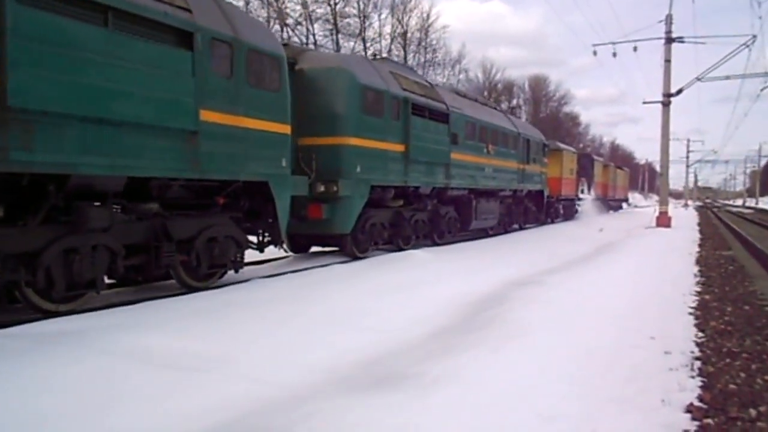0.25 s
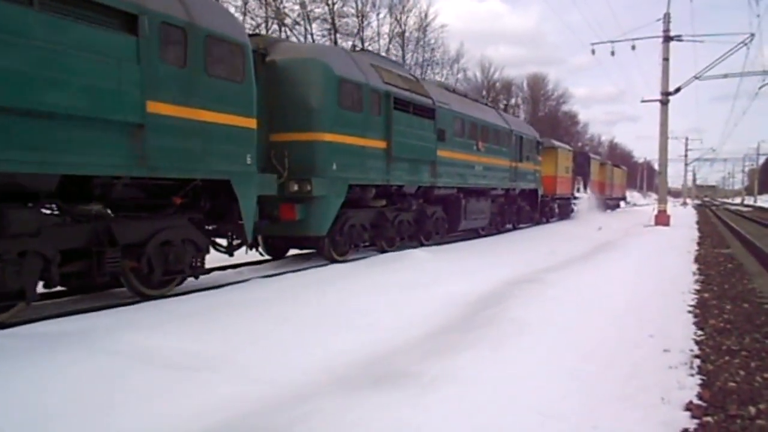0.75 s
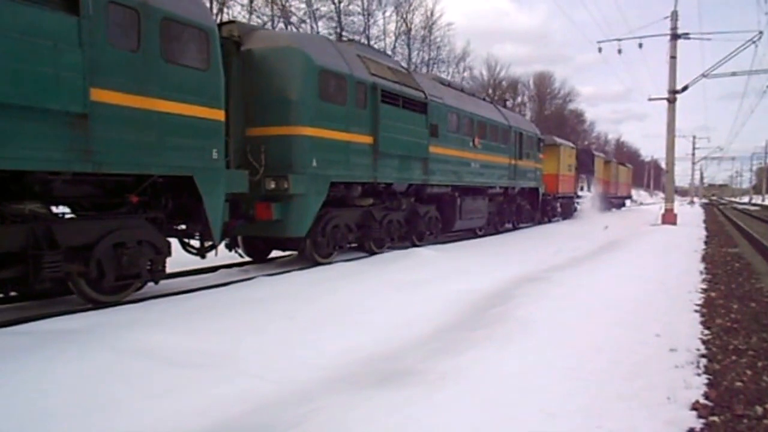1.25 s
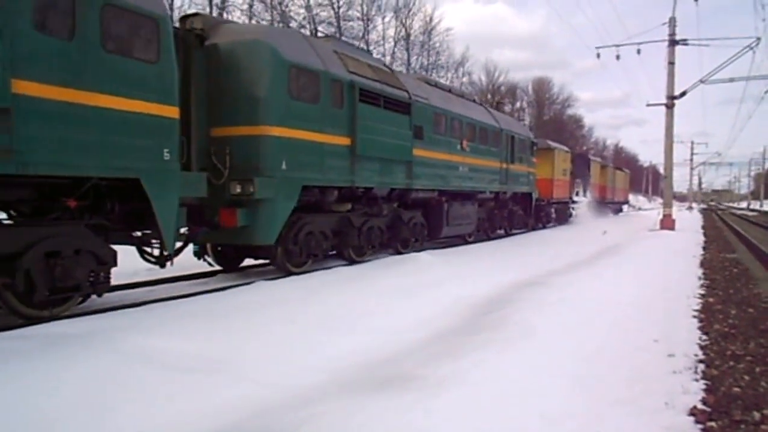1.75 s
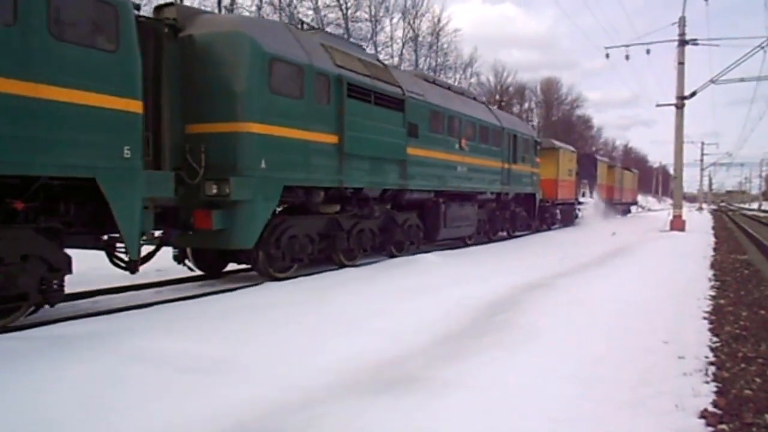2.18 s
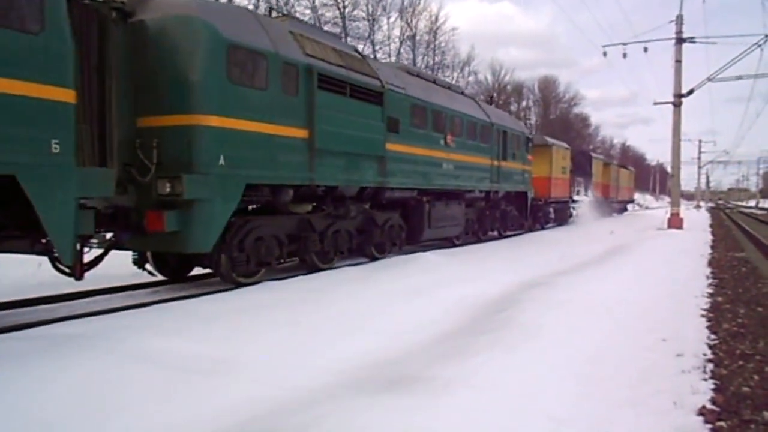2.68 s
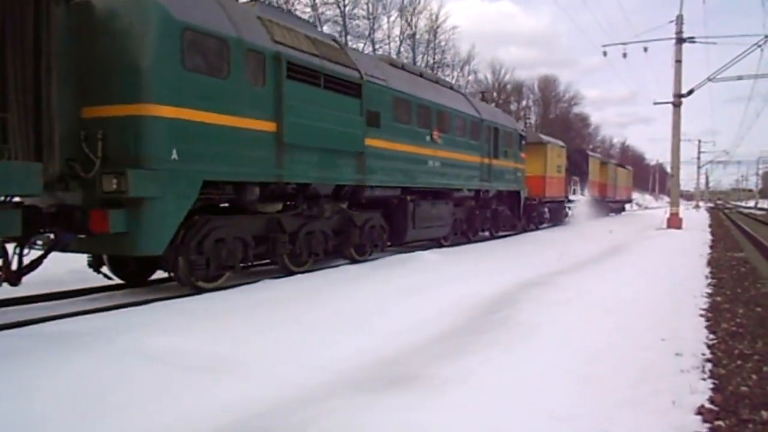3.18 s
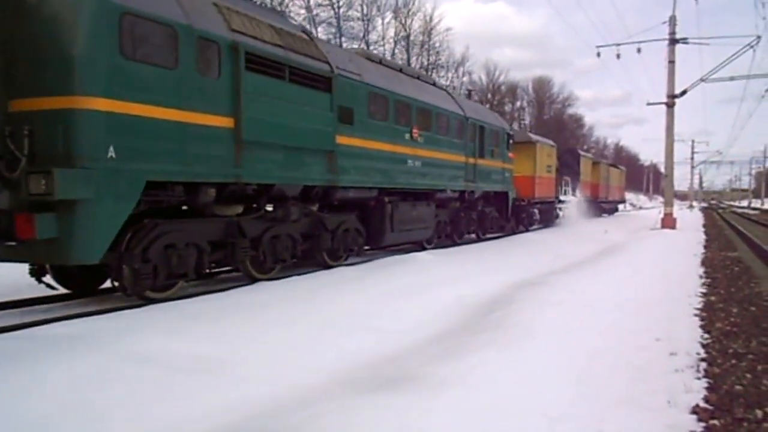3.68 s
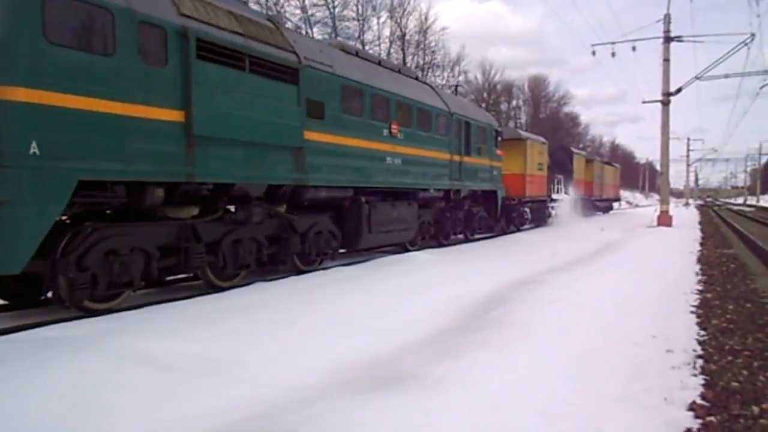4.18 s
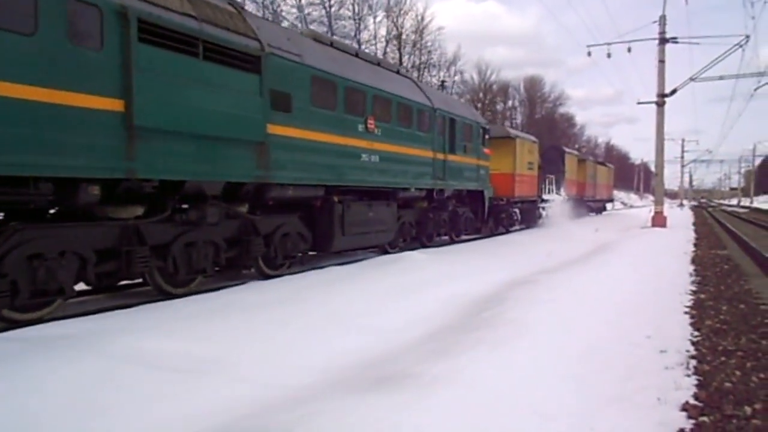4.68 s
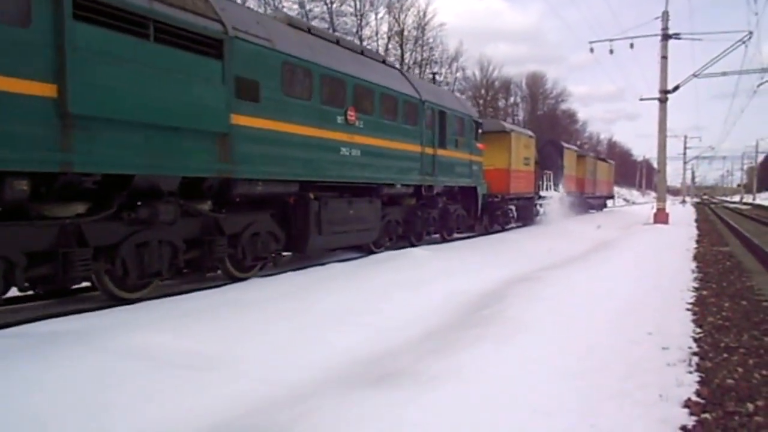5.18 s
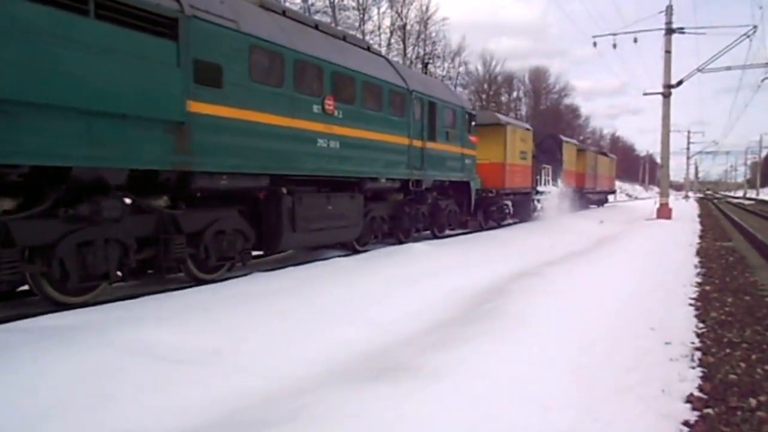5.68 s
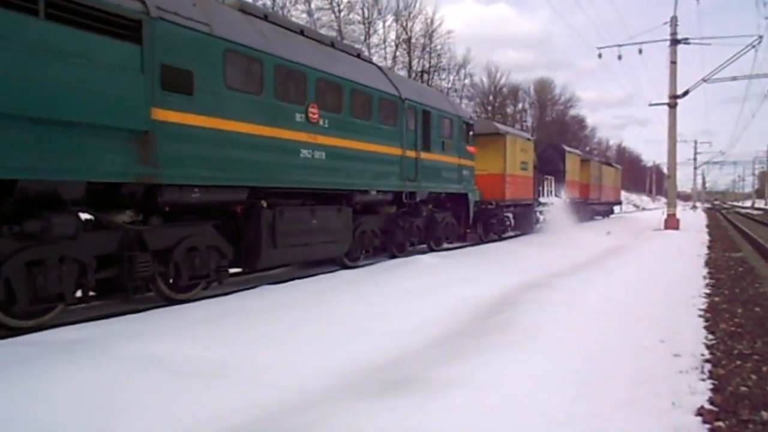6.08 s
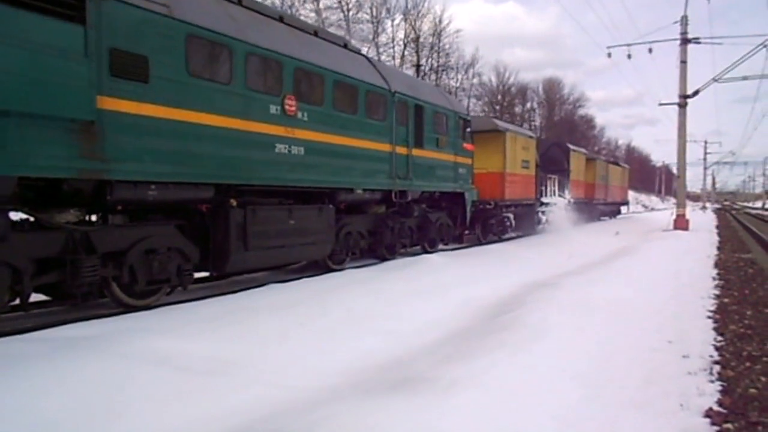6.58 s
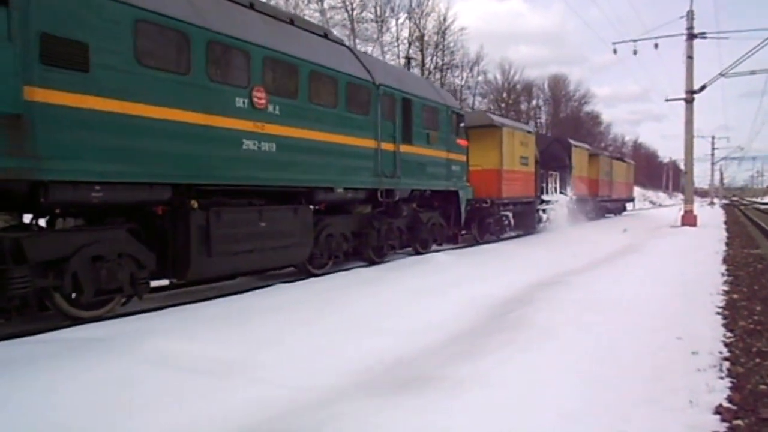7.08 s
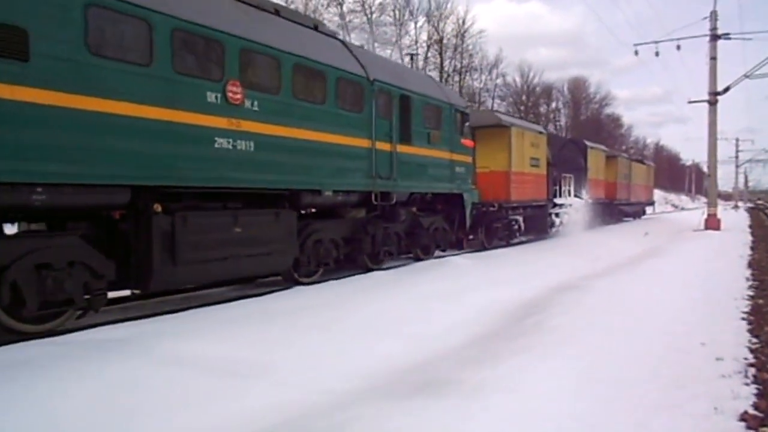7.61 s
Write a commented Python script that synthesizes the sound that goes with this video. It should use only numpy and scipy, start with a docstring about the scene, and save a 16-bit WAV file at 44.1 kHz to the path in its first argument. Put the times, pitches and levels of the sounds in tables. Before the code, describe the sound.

A heavy diesel locomotive in two sections rolls slowly by, very close to a small outdoor microphone. Two idling engines boom at slightly different speeds, making a rapid low flutter. Wheel rumble, engine-room roar, cooling-air hiss and faint gear whine surround it. Early squeaks and scrapes give way to a dull clank with an air puff, then light rattling in the middle and sharp clicks later. The engine sound continues to the end.

```python
"""A two-section diesel locomotive rolls slowly past; its engines idle at slightly different speeds.
Their exhaust notes, harmonics of each crankshaft, beat about seven times a second.
A fan hums and gears whine as tones; engine rooms, rolling wheels, air and draught are coloured noise.
Flanges scrape as shaken resonances; brake rigging squeaks by stick-slip and rattles with short decaying rings."""
import sys
import numpy as np
from scipy import signal
from scipy.fft import rfft, irfft, next_fast_len
from scipy.io import wavfile
from scipy.ndimage import uniform_filter1d, map_coordinates

SR = 44100
rng = np.random.default_rng(int(sys.argv[2]) if len(sys.argv) > 2 else 0)


def file_out(sig):
    """Save sig as 16-bit WAV at sys.argv[1]."""
    # one column per channel
    cols = np.atleast_2d(sig).T
    # limit, then scale
    lim = np.clip(cols, -1, 1)
    pcm = np.round(lim * 32767).astype(np.int16)
    wavfile.write(sys.argv[1], SR, pcm)


N = 346185
TIME = np.arange(N) / SR


def amp(db):
    """The decibel law: amplitude gain is ten to the power of level over twenty."""
    return 10 ** (np.asarray(db) / 20)


def unit(x):
    """Normalization by the root mean square, to rms 1."""
    return x / np.sqrt(np.mean(x ** 2) + 1e-20)


def curves(rows):
    """Linear interpolation in time: one value per sample for each column after the time."""
    knot_s, *columns = np.transpose(rows)
    return [np.interp(TIME, knot_s, column) for column in columns]


def wobble(rate):
    """Slow random modulation: a smooth spline through random knots, rate of them a second."""
    knots = rng.standard_normal(int(N * rate / SR) + 4)
    return map_coordinates(knots, [TIME * rate])


def filtered(x, response):
    """Linear filtering: the spectrum of x times a response of frequency."""
    size = next_fast_len(N + 8192)
    return irfft(rfft(x, size) * response(np.fft.rfftfreq(size, 1 / SR)), size)[:N]


def rush(spectrum, patchy_db):
    """Broadband noise of rms 1, with random gain patches in time and frequency, shaped by a spectrum."""
    cells = signal.stft(rng.standard_normal(N), nperseg=512)[2]
    field = uniform_filter1d(rng.standard_normal(cells.shape), size=6, axis=0)
    field = uniform_filter1d(field, size=10, axis=1)
    noise = signal.istft(cells * amp(patchy_db * unit(field)), nperseg=512)[1][:N]
    knot_hz, db = np.transpose(spectrum)
    return unit(filtered(noise, lambda hz: amp(np.interp(np.log(hz + 1), np.log(knot_hz), db))))


def ring(hz, width_hz, size):
    """A resonance driven by random friction: narrow-band noise of rms 1 around its mode."""
    lowpass = signal.butter(2, width_hz / 2, fs=SR, output="sos")
    slow = signal.sosfilt(lowpass, rng.standard_normal((2, size)))
    phase = 2 * np.pi * hz * np.arange(size) / SR
    return unit(slow[0] * np.cos(phase) + slow[1] * np.sin(phase))


def add(track, s, sound):
    """Superposition: mix a sound into the track at a time."""
    part = track[int(s * SR):][:len(sound)]
    part += sound[:len(part)]


def stroke(t, length, rise, fall):
    """Transient envelope: an exponential rise, a hold, then a free decay (all times in s)."""
    return (1 - np.exp(-t / rise)) * np.exp(-np.maximum(t - length, 0) / fall)


def passing(abeam, half, db=0):
    """Inverse-distance law for a source rolling by: 3 dB down a half-time (s) either side of abeam (s)."""
    return amp(db) / np.hypot(1, (TIME - abeam) / half)


def together(gains):
    """Incoherent sources add in power."""
    return np.sqrt(sum(gain ** 2 for gain in gains))


def parts_gain(order):
    """Incoherent sum of the inverse-distance gains of the passing parts, for one level column."""
    # noisy stretches of the locomotive (louvres, bogies) going by:
    # abeam_s, half_time_s, rolling_db, room_db, hiss_db, sizzle_db
    parts = [(.55, 0.34, -30.5, -33.5, -45.5, -53.5), (2.35, 0.61, -30, -33, -47, -58),
             (3.55, 0.13, -33.5, -45, -54, -69), (4.45, 0.66, -31, -33, -45, -70),
             (7.35, 1.39, -27.5, -31, -42.5, -59)]
    return together(passing(abeam, half, levels[order]) for abeam, half, *levels in parts)


def panels(x, ripple_db, spacing_hz=70):
    """Modal colouration: countless narrow resonances of the steel body ripple the spectrum of a noise."""
    knots = rng.standard_normal(1000)
    return unit(filtered(x, lambda hz: amp(ripple_db * map_coordinates(knots, [hz / spacing_hz]))))


def clatter(turns, depth, count=12):
    """Amplitude modulation: injectors and valves chop the noise once per cylinder, each at its own strength."""
    strokes = turns * count
    strength = rng.uniform(size=count)[np.floor(strokes).astype(int) % count]
    # the engine room blurs the edge of each stroke
    return 1 + depth * uniform_filter1d(strength * np.exp(-3 * (strokes % 1)), size=40)


def draught():
    """Turbulent pressure: the draught buffets the microphone with low-frequency noise in gusts."""
    # draught spectrum: pitch_hz, level_db (per Hz)
    rumble = [(2, -30), (6, -7), (16, 2), (35, 0), (55, -5), (80, -11), (130, -21), (300, -50), (900, -120)]
    level_db, gust_db, gusts_per_s = -23.5, 0.5, 2.8
    return amp(level_db + gust_db * wobble(gusts_per_s)) * rush(rumble, patchy_db=1.0)


def rolling():
    """Contact noise: wheels roll on the rail, the passing parts over a steady rest of the train."""
    # rolling spectrum: pitch_hz, level_db (per Hz)
    roll_spectrum = [(40, -32), (90, -1.5), (160, 2.5), (290, -1), (400, -5.5), (520, -8), (800, -28),
                     (2000, -66.5), (6000, -120)]
    # brief swells of the rolling noise: abeam_s, half_time_s, level_db
    roll_swells = [(.42, 0.18, -31.5), (2.2, .08, -36), (2.9, 0.077, -28)]
    far_db = -38  # the rest of the train
    gain = together([parts_gain(order=0), *(passing(*row) for row in roll_swells), amp(far_db)])
    return gain * rush(roll_spectrum, patchy_db=0.5)


def engine_rooms(chop):
    """Radiation through openings: engine rooms roar through their louvres, chopped by the engines."""
    # engine-room spectrum: pitch_hz, level_db (per Hz)
    room_spectrum = [(300, -19), (500, -13), (610, 1.5), (680, -0.5), (770, 0.5), (870, -2), (930, -5),
                     (1080, -8), (1260, -7), (1540, -13.5), (1750, -21.5), (2300, -28.5), (5000, -60)]
    far_db = -40.5  # the rest of the train
    gain = together([parts_gain(order=1), amp(far_db)])
    return gain * chop * rush(room_spectrum, patchy_db=0.57)


def cooling_air(chop):
    """Turbulent flow noise: cooling air hisses, coloured by the body and chopped by the engines."""
    # hiss spectrum: pitch_hz, level_db (per Hz)
    hiss_spectrum = [(100, -42.5), (900, -10.5), (1800, 1.5), (2400, -1), (2900, 1), (3700, 1),
                     (4400, -1.5), (5300, -5), (6400, -9), (7400, -10.5), (8600, -11), (9500, -15),
                     (10400, -20), (12000, -17), (13500, -32)]
    air = panels(rush(hiss_spectrum, patchy_db=1.2), ripple_db=0.9)
    return parts_gain(order=2) * amp(0.45 * wobble(22)) * chop * air


def brake_shoes():
    """Sliding friction: released shoes graze the wheel treads with a fine sizzle."""
    # sizzle spectrum: pitch_hz, level_db (per Hz)
    sizzle = [(2500, -63), (5000, -10), (6500, -9), (7400, -1), (8600, -11), (9600, -13), (12000, -12.5),
              (13500, -24)]
    return parts_gain(order=3) * amp(1.1 * wobble(14)) * rush(sizzle, patchy_db=1.5)


def scrapes(rise, fall):
    """Friction-driven resonance: a flange grinds on the rail and shakes one broad mode of its wheel."""
    # flange scrapes: start_s, length_s, pitch_hz, width_hz, level_db
    scrape_rows = [(0.326, 0.053, 1425, 260, -40), (0.469, 0.16, 1420, 300, -51),
                   (1.799, 0.27, 1365, 180, -44.5), (2.33, 0.23, 870, 120, -52),
                   (2.779, 0.29, 2097, 900, -51.5), (3.426, .2, 1927, 1300, -47),
                   (3.509, 0.3, 1227, 200, -43.5)]
    out, t = np.zeros(N), np.arange(SR // 2) / SR
    for s, length, hz, width, db in scrape_rows:
        add(out, s, amp(db) * stroke(t, length, rise, fall) * ring(hz, width, len(t)))
    return out


def rattle(fall):
    """Random impacts: small parts of a bogie tick with decaying noise, loudest as it goes by."""
    # tick spectrum: pitch_hz, level_db (per Hz)
    tick = [(1500, -19), (4200, 5), (6000, -4), (7300, 0), (8600, -3.5), (9600, -7), (13000, -14.5)]
    ticks_per_s, tick_db = 34, -51.5
    when = rng.uniform(size=int(ticks_per_s * N / SR))
    hits = amp(tick_db) * np.bincount((when * N).astype(int), minlength=N)
    gate = signal.lfilter([1], [1, -np.exp(-1 / (fall * SR))], hits)
    return passing(abeam=4.3, half=.35) * gate * rush(tick, patchy_db=2.5)


def clinks(width_hz, length, rise, fall, judder_db):
    """Friction-driven modes: loose links catch and scrape in a brief judder as a bogie rolls by."""
    # scraping links: start_s, level_db, pitch_hz (of the main ring)
    clink_rows = [(.217, -55, 8700), (.341, -50, 4420), (.469, -51, 4870), (3.778, -48.5, 4360),
                  (3.867, -51, 8540), (3.92, -56, 8650), (3.991, -58, 8140), (4.024, -49, 4170),
                  (4.068, -53, 8200), (4.12, -61, 8700), (4.152, -49, 4540), (4.196, -56, 8810),
                  (4.226, -47, 3900), (4.281, -49, 4400), (4.284, -53, 8540), (4.32, -58, 8650),
                  (4.35, -52, 8650), (4.394, -50, 8620), (4.436, -57, 8600), (4.473, -53, 8400),
                  (4.503, -52, 8550), (4.547, -49, 8580), (4.599, -46, 4060), (6.306, -48, 3700),
                  (6.793, -50, 7900), (6.941, -51, 8300)]
    # modes that every link shares: pitch_hz, width_hz, level_db (relative to the main ring)
    link_modes = [(4100, 1400, -3), (7000, 1500, -3.5), (8750, 370, -16.5)]
    out, t = np.zeros(N), np.arange(SR // 12) / SR
    for s, db, hz in clink_rows:
        body = sum(amp(level) * ring(mode, width, len(t)) for mode, width, level in link_modes)
        main = ring(hz, width_hz, len(t))
        add(out, s, amp(db) * stroke(t, length, rise, fall) * (main + body))
    return out * unit(amp(judder_db * wobble(400)))


def strikes(rise, partner, partner_db, crack_db, crack_fall):
    """Impact: a pin snaps against its stop, a tiny crack and two close modes that die at once."""
    # hard strikes: start_s, level_db, pitch_hz, decay_s
    strike_rows = [(.151, -41, 4200, .003), (.405, -37, 3900, .002), (4.026, -40, 4200, .002),
                   (4.069, -38, 4180, .003), (4.089, -42, 3400, .002), (4.397, -42, 8620, .003),
                   (4.477, -43, 8600, .002), (4.549, -41, 8600, .002), (5.545, -40, 4300, .002),
                   (6.207, -37, 8350, .002), (6.2215, -35.5, 8450, .0022), (6.241, -38.5, 8400, .0022),
                   (6.281, -43, 8400, .002), (6.29, -42, 8100, .002), (6.304, -33, 4750, .003),
                   (6.308, -32, 3750, .0035), (6.313, -35, 4850, .003), (6.795, -38, 8100, .003),
                   (6.967, -41, 8300, .003)]
    out, t = np.zeros(N), np.arange(SR // 25) / SR
    for s, db, hz, fall in strike_rows:
        modes = np.sin(2 * np.pi * hz * t)
        modes += amp(partner_db) * np.sin(2 * np.pi * partner * hz * t)
        grain = uniform_filter1d(rng.standard_normal(len(t)), size=4)
        crack = amp(crack_db) * np.exp(-t / crack_fall) * grain
        add(out, s, amp(db) * (stroke(t, 0, rise, fall) * modes + crack))
    return out


def squeaks(scatter, stutter_db, rise, fall):
    """Stick-slip: brake-rigging steel sings on one mode whose pitch trembles and whose grip comes and goes."""
    # squeaks: start_s, length_s, pitch_hz (mean), level_db
    squeak_rows = [(0.425, 0.34, 1284, -43.5), (.5, 0.13, 1478, -41), (0.519, .028, 7050, -45),
                   (1.126, .015, 7665, -54), (1.333, .014, 7400, -50), (1.414, .014, 7850, -53),
                   (1.899, 0.18, 1358, -45), (3.305, .04, 7235, -57), (3.574, .097, 6720, -55),
                   (3.583, .13, 10400, -65), (3.583, .11, 11700, -63), (4.17, 0.17, 8750, -64),
                   (5.34, .04, 7680, -59), (5.793, 0.058, 7190, -55), (5.86, .1, 7170, -58),
                   (6.1, .05, 7030, -61), (6.222, 0.04, 7270, -48), (6.262, .032, 7290, -52),
                   (7.272, 0.034, 5495, -43), (7.43, .07, 6380, -59)]
    out, t = np.zeros(N), np.arange(SR // 3) / SR
    for s, length, hz, db in squeak_rows:
        tremble = unit(uniform_filter1d(rng.standard_normal(len(t)), size=60))
        phase = 2 * np.pi * np.cumsum(hz * (1 + scatter * tremble)) / SR
        add(out, s, amp(db) * stroke(t, length, rise, fall) * np.sqrt(2) * np.sin(phase))
    return out * unit(amp(stutter_db * wobble(110)))


def puffs(rise, fall):
    """Jet noise: a valve spits a little compressed air."""
    # spits of air: start_s, length_s, level_db
    puff_rows = [(2.233, 0.028, -35)]
    # jet spectrum: pitch_hz, level_db (per Hz)
    jet = [(600, 4), (850, 22.5), (1100, 12), (1400, -1), (2200, 3.5), (4500, -5), (6000, -2), (9000, -13),
           (11000, -26)]
    gate = sum(amp(db) * stroke(np.maximum(TIME - s, 0), length, rise, fall) for s, length, db in puff_rows)
    return gate * rush(jet, patchy_db=0)


def clanks(length, rise, fall):
    """Modal ringing: heavy steel parts knock together and ring dully."""
    # knocks: start_s, level_db
    clank_rows = [(2.228, -26.5)]
    # their modes: pitch_hz, width_hz, level_db (relative)
    clank_modes = [(804, 180, 1), (960, 170, -1), (1304, 260, -5)]
    gate = sum(amp(db) * stroke(np.maximum(TIME - s, 0), length, rise, fall) for s, db in clank_rows)
    return gate * unit(sum(amp(db) * ring(hz, width, N) for hz, width, db in clank_modes))


def auxiliaries(turns, backlash_ms, flutter_db):
    """Shaft-order fan hum and gear-mesh tones; play in the gears is phase modulation, widest for high tones."""
    # fainter hums and gear tones going by: pitch_hz, abeam_s, half_time_s, level_db
    gear_rows = [(69.8, 3.3, 1.5, -37.5), (200.3, 5.85, .65, -34.5), (227, 1.5, 1.5, -49),
                 (256, 4.2, 1.0, -43), (302.5, 3.8, 1.4, -45), (340, 1.3, 1.3, -48),
                 (400.2, 6.5, 1.2, -47.5), (519.8, 4.3, 1.0, -49), (524.7, 1.9, 1.8, -43.5),
                 (585.3, 1.8, 1.0, -52), (642.8, 6, 1.4, -49), (651.7, 1.8, .65, -41), (713, 6.2, 1.2, -51),
                 (849.3, 5.6, 1.2, -52), (860.7, 6, 1.2, -49), (872.3, 3.3, 1.4, -49),
                 (1263.5, 1.2, 1.6, -50), (1302.7, 1.7, .8, -54)]
    # the two loudest gear tones, beamed through body openings: time_s, lower_db, upper_db
    whine_levels = [(0, -56.0, -40.5), (0.4, -43.0, -42), (0.85, -40.3, -52.9), (1.25, -45, -53),
                    (1.65, -37.8, -40.5), (2.0, -43.5, -42), (2.3, -37.6, -36.8), (2.55, -41.9, -33.5),
                    (2.85, -50.7, -52.9), (3.6, -54.6, -53.4), (4.6, -50.3, -46.6), (5.3, -54.4, -55.4),
                    (7.85, -50.4, -52.2)]
    whine_hz = (743.5, 756)  # close enough to beat against each other
    fan_order = 11.52  # blade beats per crankshaft turn

    def tone(hz):
        """Phase modulation: a sine read at a randomly jittered time."""
        return np.sin(2 * np.pi * hz * (TIME + backlash_ms * 1e-3 * wobble(14)))

    fan = passing(abeam=4.3, half=2.6, db=-30) * np.sin(2 * np.pi * fan_order * turns)
    whine = sum(amp(db) * tone(hz) for hz, db in zip(whine_hz, curves(whine_levels)))
    gears = 0
    for hz, abeam, half, db in gear_rows:
        gears = gears + passing(abeam, half, db + flutter_db * wobble(5.5)) * tone(hz)
    return np.sqrt(2) * (fan + whine + gears)


def crank(speed, first_firing_s, hunt):
    """Phase is the integral of speed: crankshaft turns since the first firing; the governor hunts a little."""
    return np.cumsum(curves(speed)[0]) / SR - first_firing_s * speed[0][1] + hunt * wobble(3.06)


def crankshafts():
    """Rotation of both engines, whose unequal speeds make their harmonics beat."""
    # crankshaft speed of each section: time_s, speed_turns_per_s
    lead_speed = [(0, 6.556), (.65, 6.556), (.85, 6.52), (1.1, 6.55), (1.8, 6.55), (2.1, 6.6), (2.4, 6.55),
                  (3.7, 6.55), (3.9, 6.585), (4.2, 6.556), (5.5, 6.556), (5.7, 6.497), (7.85, 6.497)]
    rear_speed = [(0, 7.755), (7.85, 7.752)]
    lead = crank(lead_speed, first_firing_s=.0046, hunt=0.0025)
    rear = crank(rear_speed, first_firing_s=.0095, hunt=0.0016)
    return lead, rear


def exhaust(turns, boom_db, orders, stack, lope, flutter_db, count=6):
    """Harmonic series: six beats a turn boom; unequal cylinders add orders that swell and bark once a turn."""
    # brief swells of the boom: peak_s, half_length_s (to 1/e of level_db), level_db
    boom_swells = [(0.848, 0.0098, 3), (0.996, 0.02, 4.5), (4.64, .03, 2.5), (6.65, 0.024, 3),
                   (7.782, 0.022, 7.5)]
    bark_order = 22  # shaft order at which the stack barks
    lope_scatter = .04  # how far neighbouring lines stray, turns
    throb, drone = (passing(*row) for row in stack)
    swell_db = sum(db * np.exp(-((TIME - s) / half) ** 2) for s, half, db in boom_swells)
    out = amp(boom_db + swell_db) * np.cos(2 * np.pi * count * turns)
    for order, db in orders:
        # the higher lines are shaded by the body as the stack moves away
        gain = drone if order > 3 * count else throb
        # lines near the boom or the bark crest together with it; those further off fall out of step
        centre, crest = (count, lope[0]) if order < 10 else (bark_order, lope[1])
        crest_turns = crest + lope_scatter * rng.uniform(-0.93, 1)
        cycles = order * turns - (order - centre) * crest_turns
        out += gain * amp(db + flutter_db * wobble(4)) * np.cos(2 * np.pi * cycles)
    return np.sqrt(2) * out


def engines(lead, rear):
    """Superposition of two exhausts: their close harmonics interfere and beat."""
    # exhaust boom level of each section: time_s, lead_db, rear_db
    boom = [(0, -19.1, -24.3), (0.45, -18.1, -24.7), (0.85, -17.8, -19.2), (1.3, -19.5, -21.5),
            (1.75, -21.0, -20.6), (2.3, -21.3, -19.4), (2.65, -16.9, -18.7), (2.85, -17.3, -20.6),
            (3.1, -20.4, -25.7), (3.4, -19.0, -22.1), (3.7, -19.3, -21.7), (4.25, -20.7, -21.2),
            (4.55, -16.7, -19.3), (5.1, -20.8, -19.9), (5.75, -23.3, -23.1), (6.0, -21.5, -18.2),
            (6.3, -21.7, -21.7), (6.9, -20.7, -17.1), (7.45, -24.2, -19.0), (7.85, -21.4, -16.1)]
    # exhaust lines: shaft_order, level_db (before the gain of passing)
    lead_orders = [(3, -38), (4, -40), (5, -30.5), (8, -35), (9, -31.5), (11, -43), (12, -44), (14, -44),
                   (15, -42), (16, -48), (21, -42), (22, -35.5), (23, -37.5), (24, -42), (26, -43),
                   (27, -44), (32, -46), (38, -48)]
    rear_orders = [(3, -37), (7, -30), (8, -27.5), (9, -32.5), (12, -41), (13, -41), (14, -39), (15, -41),
                   (16, -42), (18, -43), (20, -44), (22, -36), (23, -37), (24, -43), (25, -42), (26, -44),
                   (27, -45), (29, -46), (33, -48)]
    # each stack going by, a row for its low throb and one for its higher drone: abeam_s, half_time_s, gain_db
    lead_pass = [(2.3, 2.7, 0.5), (2.24, 1.42, 1.5)]
    rear_pass = [(8.2, 1.5, 2), (6.46, 1.56, 0.18)]
    lead_db, rear_db = curves(boom)
    # lope: where in each turn the boom swells and the stack barks, as shares of a turn
    leading = exhaust(lead, lead_db, lead_orders, lead_pass, lope=(.62, .42), flutter_db=3.0)
    trailing = exhaust(rear, rear_db, rear_orders, rear_pass, lope=(.12, .37), flutter_db=2.0)
    return leading + trailing


def scene():
    """Superposition of both engines, the running gear and its small noises."""
    lead, rear = crankshafts()
    chop = unit(clatter(lead, depth=0.13) * clatter(rear, depth=0.42))
    background = draught() + rolling() + engine_rooms(chop) + cooling_air(chop)
    wheels = brake_shoes() + scrapes(rise=0.011, fall=0.036)
    rigging = rattle(fall=0.0078)
    rigging += clinks(width_hz=500, length=.010, rise=.001, fall=.005, judder_db=3)
    rigging += strikes(rise=.0003, partner=.93, partner_db=-6, crack_db=-2, crack_fall=.0015)
    rigging += squeaks(scatter=.011, stutter_db=2.5, rise=.004, fall=.005)
    machinery = puffs(rise=0.0043, fall=0.049) + clanks(length=0.0088, rise=.002, fall=0.022)
    machinery += auxiliaries(lead, backlash_ms=0.04, flutter_db=1.0)
    return (background + wheels + rigging + machinery + engines(lead, rear))[None]


def record(dry):
    """Transducer response: a small microphone loses treble, and a band limit removes all above it."""
    # treble response of the microphone: pitch_hz, gain_db
    microphone = [(9000, 0), (10400, -4), (11000, -20), (11800, -12), (13500, -16.5)]
    top_hz = 13700
    knot_hz, gain_db = np.transpose(microphone)
    return filtered(dry[0], lambda hz: amp(np.interp(hz, knot_hz, gain_db)) * (hz < top_hz))[None]


dry = scene()
out = record(dry)
file_out(out)
```